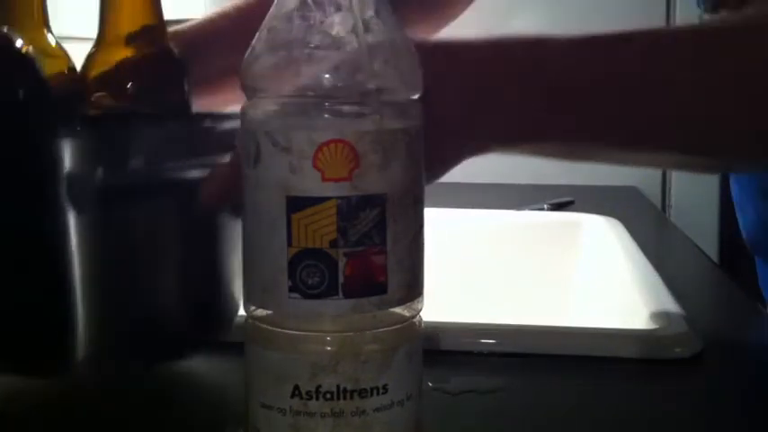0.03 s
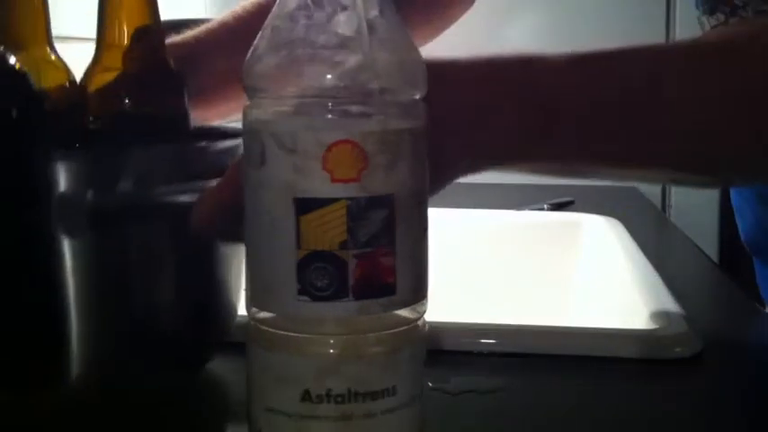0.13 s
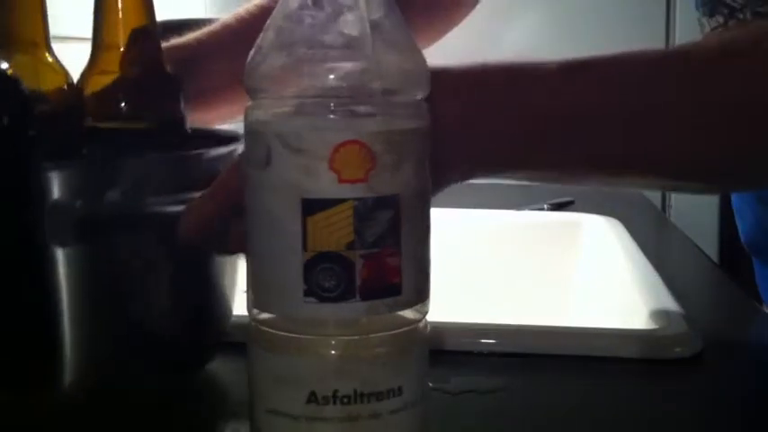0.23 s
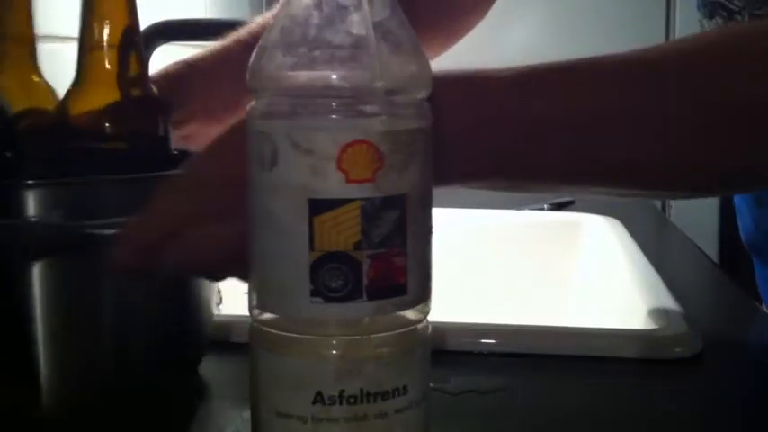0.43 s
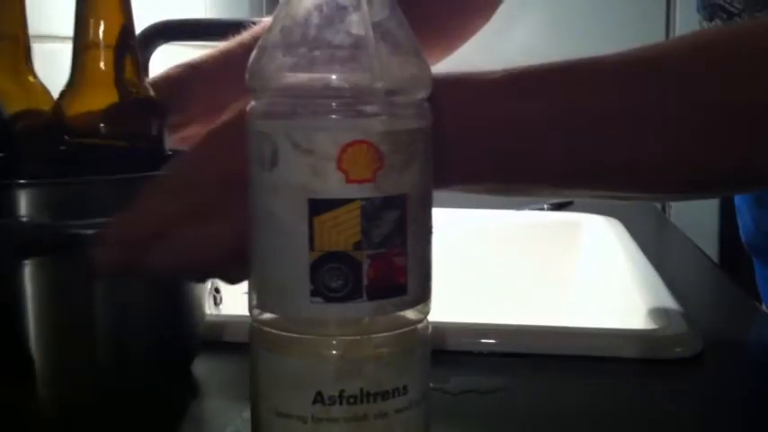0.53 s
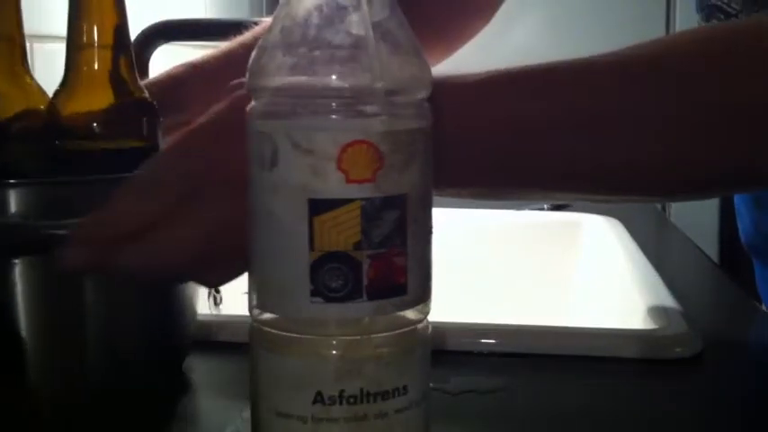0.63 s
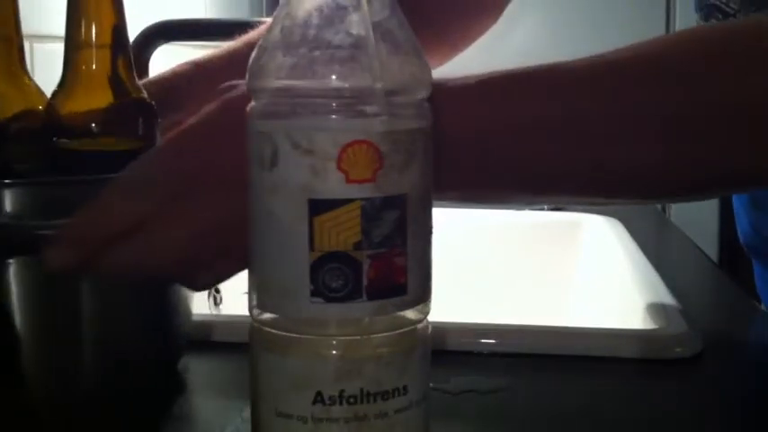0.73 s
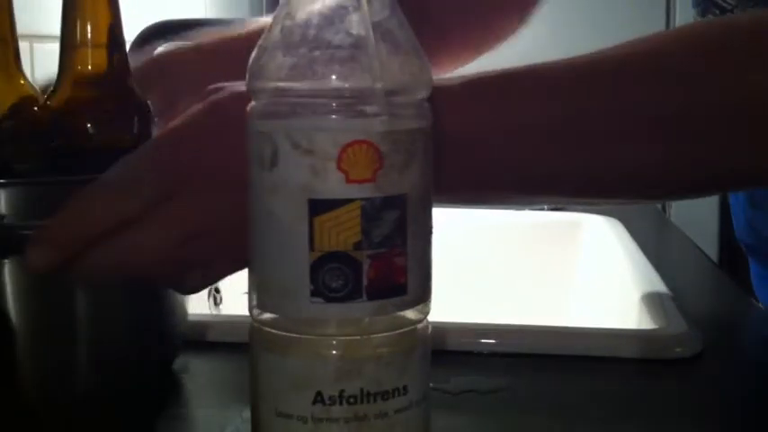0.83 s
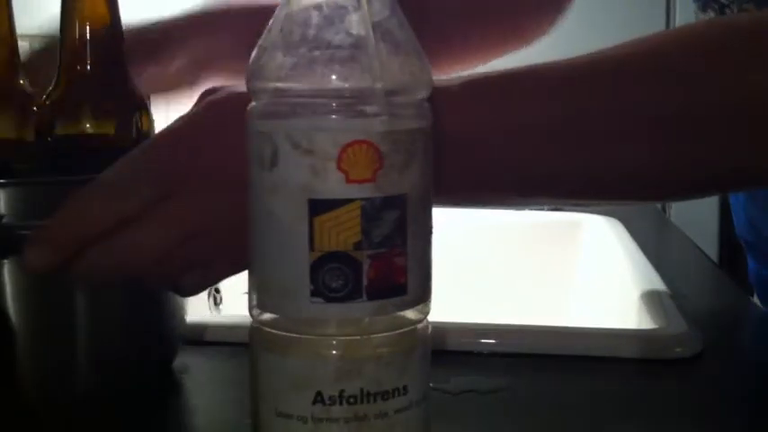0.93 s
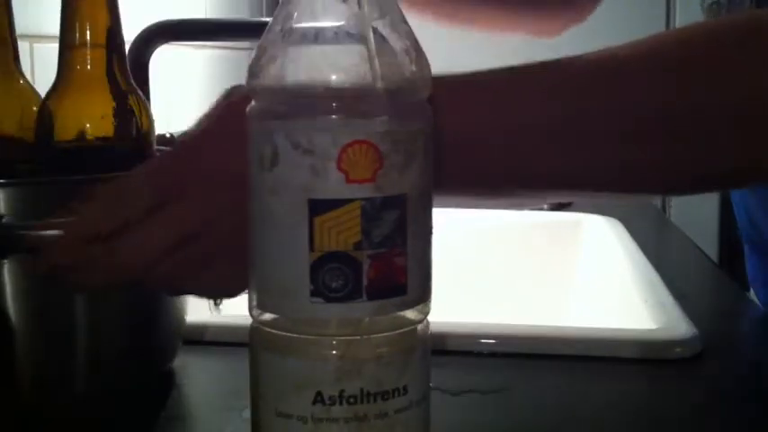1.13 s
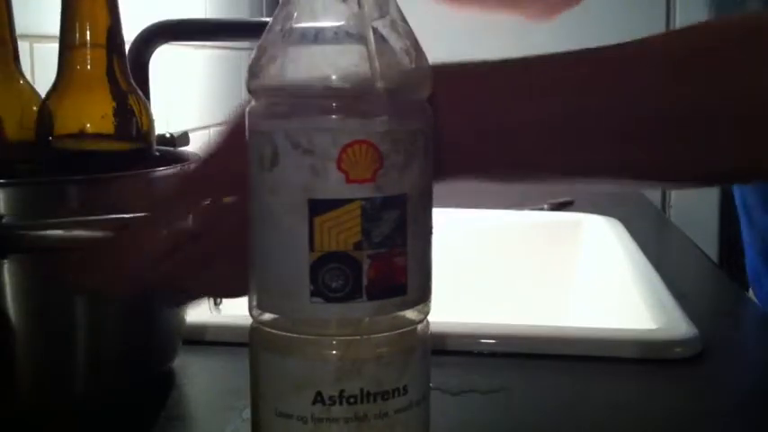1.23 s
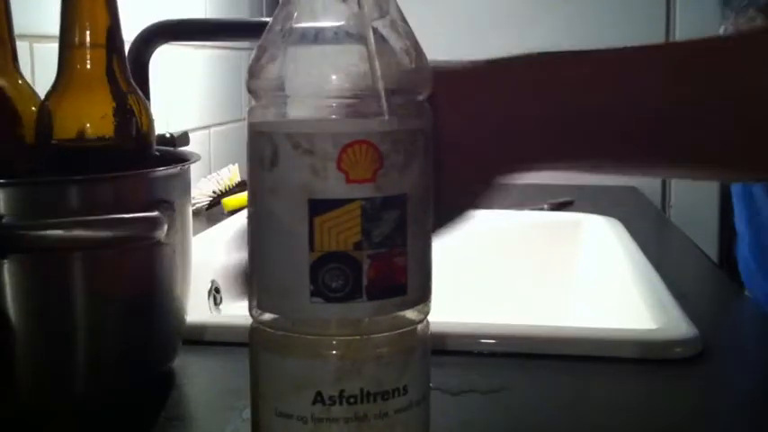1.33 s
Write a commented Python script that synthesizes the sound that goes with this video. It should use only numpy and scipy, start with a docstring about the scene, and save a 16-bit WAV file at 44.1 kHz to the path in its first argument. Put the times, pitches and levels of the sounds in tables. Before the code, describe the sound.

A metal pot loaded with glass bottles bumps and slides over a kitchen worktop, close to the microphone. Three knocks and a stuttering scrape lead into bright clinking and chattering, then everything settles, with a short echo from the small room.

```python
"""A quiet kitchen, a small microphone close to the worktop. A steel pot holding glass bottles is
shoved along: it knocks down three times, its base drags, and the bottles clink and chatter
against its wall until it rests. The small hard room answers every blow, and the loudest ones
just touch the recorder's limiter."""
import sys
import numpy as np
from scipy import signal
from scipy.fft import rfft, irfft, next_fast_len
from scipy.io import wavfile
from scipy.ndimage import uniform_filter1d, minimum_filter1d

SR = 44100
rng = np.random.default_rng(int(sys.argv[2]) if len(sys.argv) > 2 else 0)


def to_wav(sig):
    """Store sig (one row per channel, or 1-D mono) as 16-bit WAV at the path in sys.argv[1].

    Samples outside -1..1 are clipped; the rate is SR.
    """
    pcm = np.clip(np.atleast_2d(sig), -1, 1) * 32767
    pcm = np.round(pcm).astype(np.int16)
    wavfile.write(sys.argv[1], SR, pcm.T)  # frames by channels


N = 61739
T = np.arange(N) / SR
RING_T, BLOW_T = T[:24000], T[:6000]

# modes of the two glass bottles, one list each: f/Hz, level/dB, t60/s
BOTTLE_MODES = [
    [(2612, -4.5, 0.07), (2800, -3, 0.054), (3022, -4.5, 0.17), (3070, -4.5, 0.2), (3936, -16, 0.11),
     (6410, -18, 0.11), (8140, -23, 0.11), (10500, -24.5, 0.077), (12200, -32, .1), (12240, -24, .1),
     (15020, -33, .08)],
    [(3030, -7, 0.17), (3127, -8.5, .24), (3158, -3, 0.14), (3180, -4, 0.13), (3212, -8.5, 0.094),
     (3614, -9.5, .08), (3680, -11, 0.02), (4530, -10.5, 0.048), (4665, -7.5, 0.056), (4730, -8, 0.104),
     (4780, -15, .06), (5140, -14.5, 0.081), (5590, -13, 0.11), (5840, -13.5, 0.14), (6270, -15, 0.091),
     (7930, -21, 0.054), (8390, -19, .1), (8560, -21, .08), (10430, -27.5, .1), (11080, -32, .12),
     (12350, -24.5, .1), (12900, -27.5, .12), (15200, -29, .1)],
]
# modes of the steel pot wall: f/Hz, level/dB, t60/s
WALL_MODES = [(170.6, -10.5, 0.31), (363, -2, 0.082), (560, -3, 0.12), (716, -0.5, .09), (799, 1, 0.12),
              (917, 0.5, 0.07), (1009, -0.5, 0.15), (1054, -3, 0.2), (1113, -1.5, 0.14), (1182, 1.5, .11),
              (1281, -4.5, 0.24), (1306, -12, 0.19), (1512, -7.5, 0.14), (1592, -6.5, .09)]


def amp(db):
    """Decibels to gain."""
    return 10 ** (np.asarray(db) / 20)


def unit(x):
    """Scales to rms 1."""
    return x / np.sqrt(np.mean(x ** 2) + 1e-20)


def fade(t, t60):
    """Exponential decay, 60 dB down after t60 seconds."""
    return np.exp(-np.log(1000) * t / np.maximum(t60, 1e-3))


def read(points, hz):
    """Reads a table on a log-frequency axis."""
    f, value = np.transpose(points)
    return np.interp(np.log(hz + 1), np.log(f), value)


def add(mix, s, sound):
    """Mixes a sound in at time s."""
    part = mix[max(round(s * SR), 0):][:len(sound)]
    part += sound[:len(part)]


def colour(x, points, tilt_db=0):
    """Gives a signal a spectrum, tilted by tilt_db per octave, at rms 1."""
    size = next_fast_len(len(x), True)
    hz = np.fft.rfftfreq(size, 1 / SR)
    octaves = np.log2((hz + 100) / 3000)
    gain = amp(read(points, hz) + tilt_db * octaves)
    return unit(irfft(rfft(x, size) * gain, size)[:len(x)])


def ring(modes, t60_scale=1, scatter_db=-2.0, detune=.005):
    """One strike on a set of modes; the point of contact varies their shares, signs and tuning."""
    out = np.zeros(len(RING_T))
    contact = rng.uniform(-0.91, 1, (len(modes), 3))
    for (hz, db, t60), (share, sign, shift) in zip(modes, contact):
        t = RING_T[RING_T < 2 * t60 * t60_scale]
        envelope = fade(t, t60 * t60_scale) * (1 - np.exp(-hz * t))
        tone = np.sin(2 * np.pi * hz * (1 + detune * shift) * t)
        add(out, 0, np.sign(sign) * amp(db + scatter_db * share) * envelope * tone)
    return out


def slips(per_s=700, spread_db=2.5):
    """Sliding contact: a dense random train of tiny impacts, rms 1."""
    size = amp(spread_db * np.minimum(rng.exponential(1, N), 3))
    return unit(size * rng.choice([-1., 1.], N) * (rng.random(N) < per_s / SR))


def room_tone(steady_db=-65.5, wash_db=-57, wash_t60_s=1.2):
    """Steady kitchen noise under a faint wash of earlier clatter, still dying away at the start."""
    # spectra of the steady noise and of the wash: f/Hz, relative level/dB
    steady_spectrum = [(18, -66.5), (30, -46.5), (144, -10.5), (177, -6.5), (315, -14), (479, -32),
                       (591, -15.5), (1720, -23), (2070, -20), (2620, -23.5), (15500, -28.5)]
    wash_spectrum = [(88, -31.5), (150, -1.5), (404, -7), (562, -16), (627, -10), (1010, -3), (1090, -14),
                     (1350, 3), (2140, -10.5), (3150, 1), (12000, -21), (15600, -52), (22000, -120)]
    steady = colour(rng.standard_normal(N), steady_spectrum)
    wash = colour(rng.standard_normal(N), wash_spectrum) * fade(T, wash_t60_s)
    return amp(steady_db) * steady + amp(wash_db) * wash


def glass_taps():
    """Glass meets steel in bright, dry clacks that hardly ring."""
    # taps: t/s, level/dB, t60/s, tilt/(dB per octave)
    taps = [(0.1277, -22.5, 0.086, 1.5), (.3160, -45.5, 0.17, 2), (0.4355, -37.5, 0.04, 3),
            (0.5247, -20.5, .06, -4.5), (.5795, -37, .04, 2), (0.618, -34.5, 0.058, 0),
            (0.6403, -39, 0.17, 8), (0.716, -27, 0.071, -1.5), (0.88, -51.5, 0.042, 24),
            (.9480, -50, 0.051, 11.5)]
    # spectrum of a tap: f/Hz, relative level/dB
    spectrum = [(40, -12), (100, -3.5), (180, -4), (380, 8.5), (650, -2.5), (1400, -2.5), (2000, 4.5),
                (4500, 2), (7000, -10), (10000, -22.5), (16000, -26.5)]
    out = np.zeros(N)
    for s, db, t60, tilt_db in taps:
        clack = colour(rng.standard_normal(len(BLOW_T)), spectrum, tilt_db)
        add(out, s, amp(db) * clack * fade(BLOW_T, t60))
    return kitchen(out)


def pot_knocks(rise_s=.0003, crack_t60_s=0.052):
    """Each blow of the loaded pot is a damped thud, a crack of contact noise and a worktop boom."""
    # blows: t/s, thud f/Hz, thud level/dB, thud t60/s,
    # crack level/dB, crack tilt/(dB per octave), boom level/dB
    blows = [(0.128, 364, -29.5, .08, -54, 1, -35.5), (.2287, 1330, -3.5, 0.0091, -14.5, 1.5, -33),
             (.2327, 280, 3, 0.022, -12.5, -1, -16.5), (.2375, 769, -12.5, .035, -25.5, 1, -34),
             (.2482, 202, -7.5, 0.0089, -39, 6, -34.5), (.4157, 218, -22, 0.083, -55, -11.5, -34),
             (0.436, 362, -25.5, .06, -42.5, -5.5, -35), (.4625, 260, -20, 0.083, -56, 0, -37),
             (.4838, 518, 5.5, 0.015, -9.5, -1, -25.5), (.4843, 1123, -10, 0.034, -22, 0.5, -44),
             (.4925, 356, 2.5, 0.014, -32.5, -7, -19.5), (0.5099, 918, 2, 0.024, -20, -4.1, -26),
             (.5993, 269.7, -17.5, 0.092, -48, -1.5, -32), (0.646, 370, -32.5, 0.085, -31, 7, -28),
             (.6990, 1100, -14, 0.014, -41, -9.5, -52), (.7162, 905, 8, 0.0061, -18.5, -8.5, -23),
             (0.718, 332, -14.5, 0.032, -33, -2, -30), (.7224, 1100, -9.5, 0.016, -16.5, -8, -31.5),
             (.8675, 1100, -22, 0.018, -46, 10, -48.5), (.8740, 412, -21.5, 0.048, -44, -24, -41),
             (1.3950, 934, -24.5, 0.088, -26, 7, -71.5)]
    # spectrum of the contact noise: f/Hz, relative level/dB
    crack_spectrum = [(60, -9), (170, -2.5), (400, 4), (900, 2.5), (1500, -1), (2300, -7), (3500, -17.5),
                      (6000, -21.5), (9000, -39.5), (16000, -44.5)]
    # modes of the worktop: f/Hz, level/dB, t60/s
    worktop_modes = [(124, -10.5, 0.054), (174, -3.5, .11), (195, -1, 0.12)]
    out, t = np.zeros(N), BLOW_T
    rise = 1 - np.exp(-(t / rise_s) ** 2)
    boom = sum(amp(db) * fade(t, t60) * np.sin(2 * np.pi * hz * t) for hz, db, t60 in worktop_modes)
    for s, hz, thud_db, t60, crack_db, tilt_db, boom_db in blows:
        thud = np.sin(2 * np.pi * hz * t) * fade(t, t60)
        crack = colour(rng.standard_normal(len(t)), crack_spectrum, tilt_db) * fade(t, crack_t60_s)
        add(out, s, rise * (amp(crack_db) * crack - amp(thud_db) * thud - amp(boom_db) * boom))
    return kitchen(out)


def base_drag():
    """The pot's base stutters over the worktop with a low rumble."""
    # course of the drag: t/s, level/dB
    course = [(0, -72.5), (.12, -59), (.22, -39.5), (.27, -27.5), (.33, -32.5), (.37, -45), (.43, -42.5),
              (.54, -28), (.63, -36), (.7, -41.5), (.8, -38.5), (.88, -32), (.93, -69), (1, -71.5),
              (1.4, -78.5)]
    # spectrum of the rumble: f/Hz, relative level/dB
    spectrum = [(80, -24), (180, 2), (300, 0.5), (400, 8.5), (550, -5), (1000, -8), (1600, -13.5),
                (2600, -21), (6000, -37.5), (15000, -60)]
    s, db = np.transpose(course)
    return kitchen(colour(slips(), spectrum) * amp(np.interp(T, s, db)))


def bottle_chatter(soft_hz=4000):
    """Tiny impacts keep the pot wall and the leaning bottle ringing while the pot slides."""
    # course of the chatter: t/s, wall level/dB, glass level/dB
    course = [(.4, -69, -92), (.46, -53.5, -62), (0.539, -51, -60), (.62, -32.5, -43.5),
              (.69, -39.5, -46.5), (.74, -26, -31.5), (.81, -33, -39.5), (.865, -25, -36.5),
              (0.909, -32, -40), (0.949, -42.5, -67), (.965, -78.5, -85), (1.05, -89, -95)]
    s, wall_db, glass_db = np.transpose(course)
    pole = np.exp(-2 * np.pi * soft_hz / SR)  # rubbing is softer than a clink and excites less treble
    hits = signal.lfilter([1 - pole], [1, -pole], slips()) * (T > s[0]) * (T < s[-1])
    out = np.zeros(N)
    for modes, db in ((WALL_MODES, wall_db), (BOTTLE_MODES[1], glass_db)):
        body = ring(modes, t60_scale=0.21)  # the parts damp each other as they rub
        drive = hits * amp(np.interp(T, s, db))
        out += signal.fftconvolve(drive, body / np.linalg.norm(body))[:N]
    return kitchen(out)


def bottle_clinks():
    """Bottles strike each other and the pot, and all ring freely."""
    # clinks: t/s, then level/dB of first bottle, second bottle, pot wall, pot rim
    clinks = [(.4360, -56, -72.5, -54.5, -28), (.5110, -46, -54, -21, -36),
              (0.6422, -26.5, -65, -33.5, -23), (0.6987, -33, -36.5, -44, -52),
              (0.7166, -31.5, -27, -22.5, -26), (.7265, -45, -25, -23, -39.5),
              (.7500, -48.5, -42, -25, -54), (.7680, -47, -32, -31, -28), (.7900, -44, -38, -31.5, -34),
              (0.8795, -47, -34.5, -31, -42), (.9190, -43, -40, -39, -51), (0.9447, -46.5, -60, -46, -49.5)]
    # modes of the pot rim: f/Hz, level/dB, t60/s
    rim_modes = [(1331, -2.5, .17), (1331, -3.5, .12), (3335, -19.5, 0.05)]
    bodies = BOTTLE_MODES + [WALL_MODES, rim_modes]
    out = np.zeros(N)
    for s, *levels_db in clinks:
        add(out, s, sum(amp(db) * ring(modes) for db, modes in zip(levels_db, bodies)))
    return kitchen(out)


def kitchen(x, early_db=-5.5, early_t60_s=0.092, tail_delay_s=.004):
    """Close direct sound, quick reflections from worktop and walls, and a short tail."""
    # decay time of the room's tail: f/Hz, t60/s
    tail_decay = [(150, 0.53), (400, 0.59), (1000, 0.52), (3000, 0.51), (6000, 0.29), (14000, 0.29)]
    # spectrum of the tail: f/Hz, level/dB
    tail_spectrum = [(150, -9), (400, -12), (1000, -13), (3000, -4), (6000, -8.5), (14000, -13.5)]
    early_noise, tail_noise = rng.standard_normal((2, len(RING_T)))
    early = early_noise * fade(RING_T, early_t60_s) * (RING_T > .002)
    hz, t, bands = signal.stft(tail_noise, SR, nperseg=256)
    t60 = read(tail_decay, hz)[:, None]
    unit_energy = np.sqrt(2 * np.log(1000) / (t60 * SR))
    bands = bands * fade(t, t60) * unit_energy * amp(read(tail_spectrum, hz))[:, None]
    echo = amp(early_db) * early / np.linalg.norm(early)
    add(echo, tail_delay_s, signal.istft(bands, SR, nperseg=256)[1])
    return x + signal.fftconvolve(x, echo)[:N]


def microphone(x, size=4096):
    """The small microphone thins out the bass, as a minimum-phase filter."""
    # microphone response: f/Hz, level/dB
    response = [(20, -25.5), (80, -24), (115, -12), (165, -1), (250, 0), (16000, -1.5)]
    log_gain = np.log(amp(read(response, abs(np.fft.fftfreq(size, 1 / SR)))))
    impulse = np.fft.ifft(np.exp(np.conj(signal.hilbert(log_gain)))).real
    return signal.fftconvolve(x, impulse[:size // 2])[:N]


def scene():
    """The pot and its bottles, close to one microphone, over the room tone."""
    pot = pot_knocks() + glass_taps() + bottle_clinks() + base_drag() + bottle_chatter()
    return (microphone(pot) + room_tone())[None]


def record(dry, ceiling=.9, cutoff_hz=15800):
    """The recorder's quick limiter holds down the highest peaks, then the top treble is cut."""
    gain = ceiling / np.maximum(abs(dry), ceiling)
    smooth_gain = uniform_filter1d(minimum_filter1d(gain, size=89), size=89)  # 2 ms windows
    lowpass = signal.firwin(511, cutoff_hz, window=("kaiser", 9), fs=SR)
    return signal.oaconvolve(dry * smooth_gain, lowpass[None], "same")


dry = scene()
out = record(dry)
to_wav(out)
```